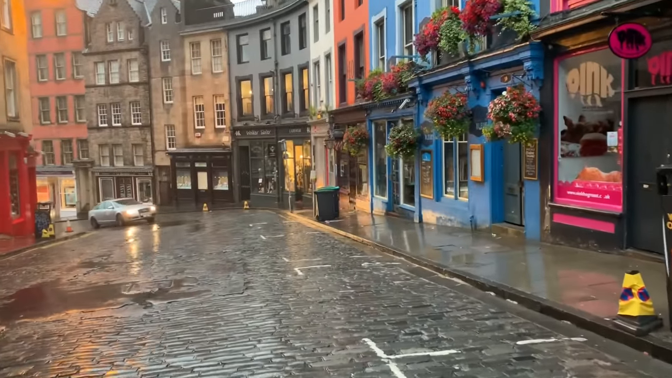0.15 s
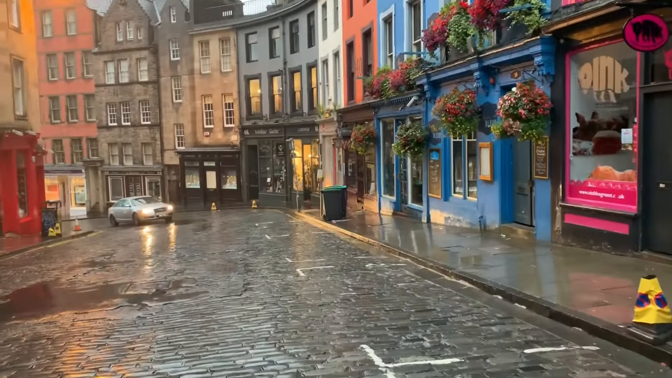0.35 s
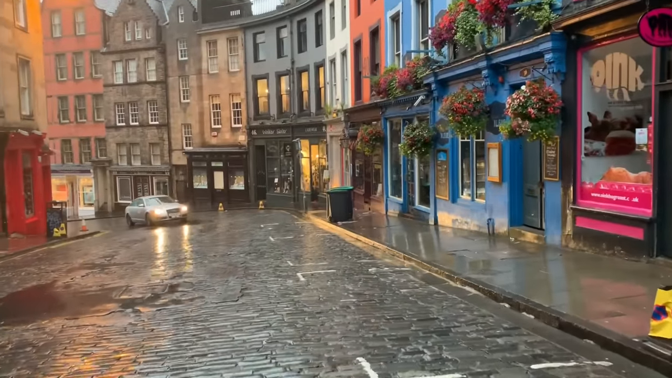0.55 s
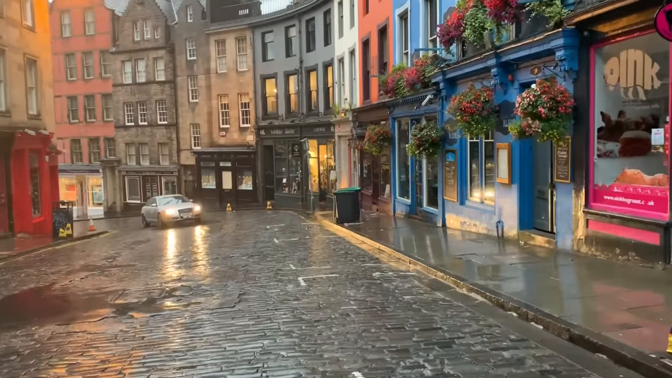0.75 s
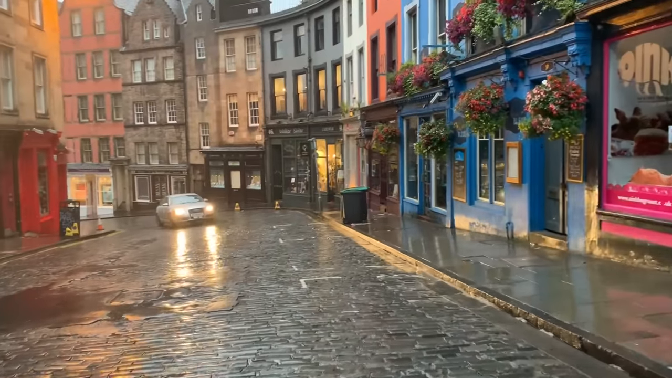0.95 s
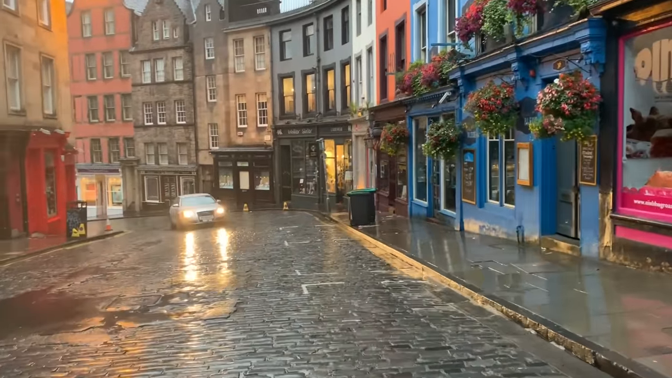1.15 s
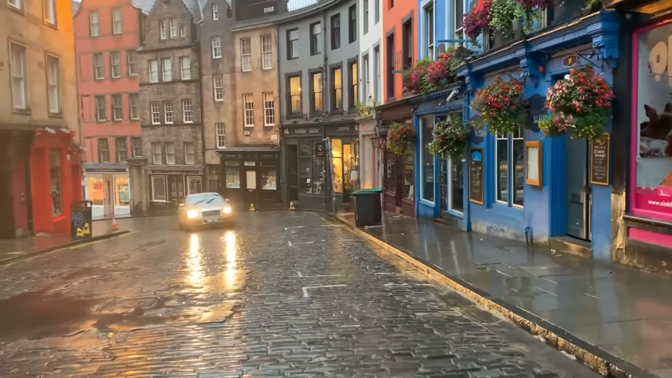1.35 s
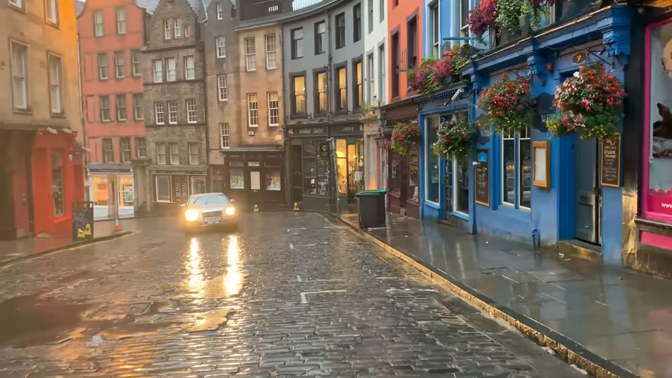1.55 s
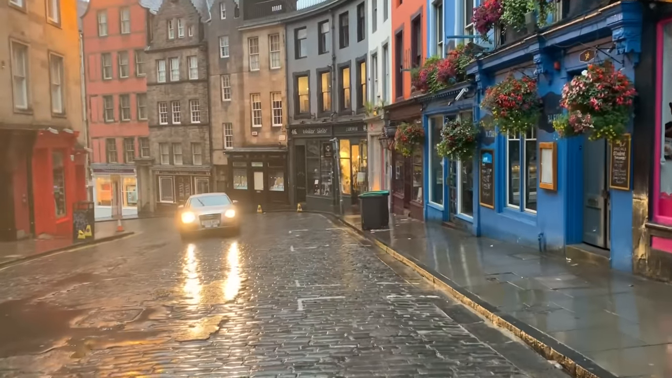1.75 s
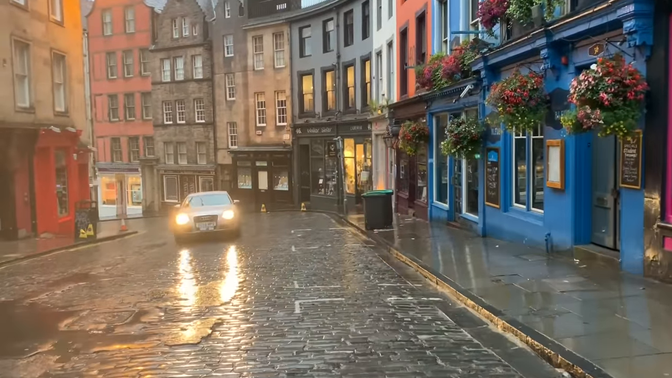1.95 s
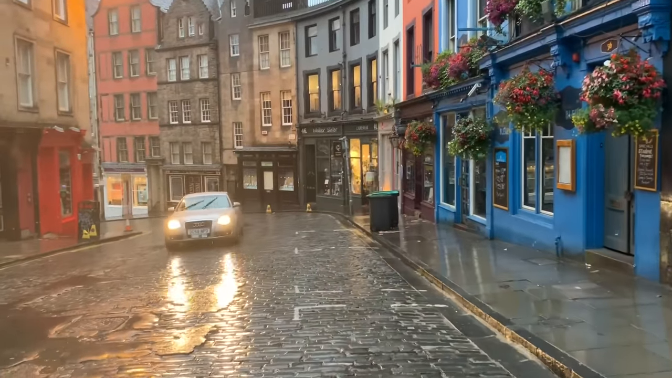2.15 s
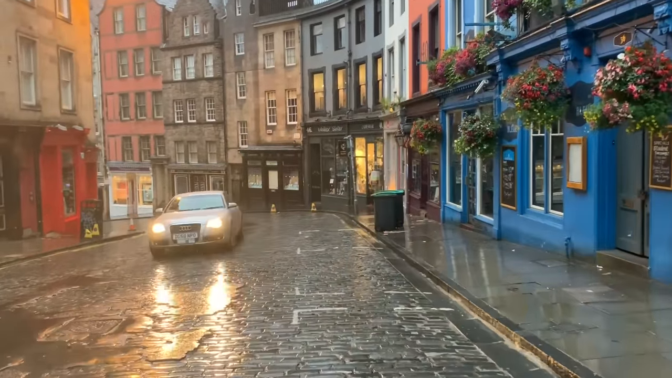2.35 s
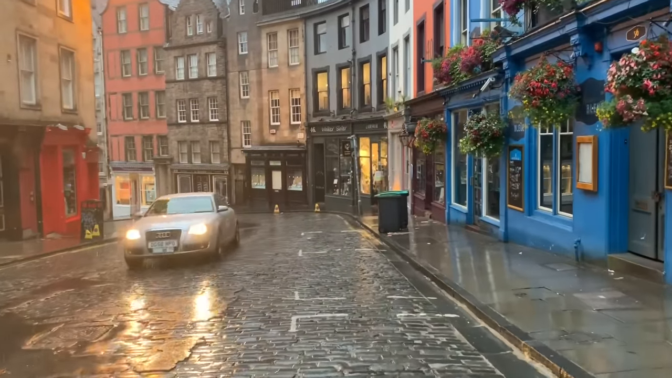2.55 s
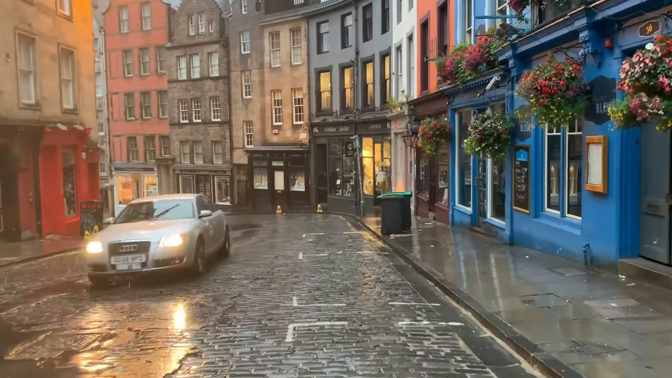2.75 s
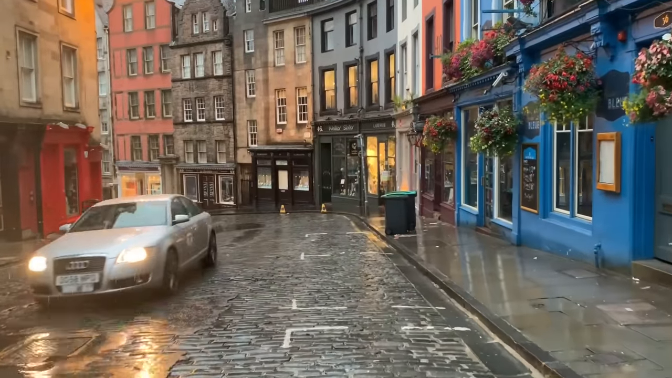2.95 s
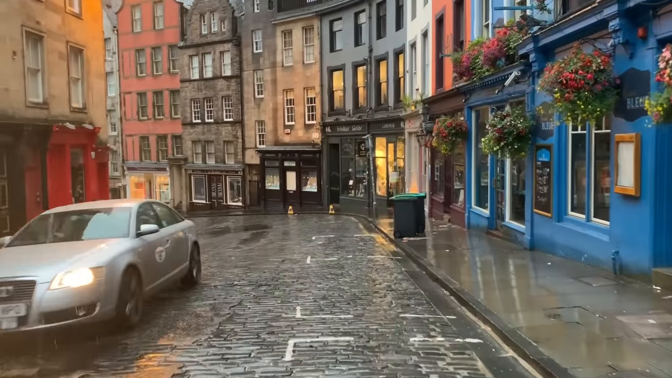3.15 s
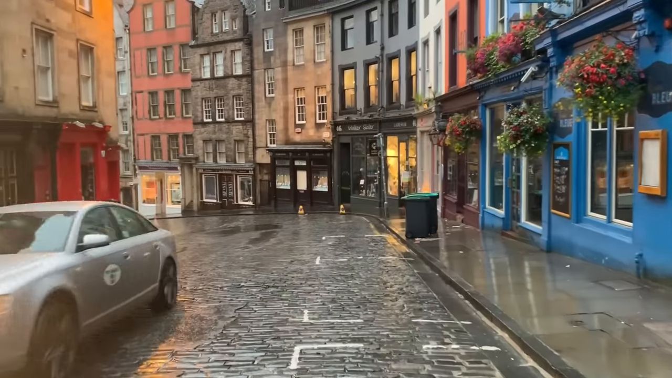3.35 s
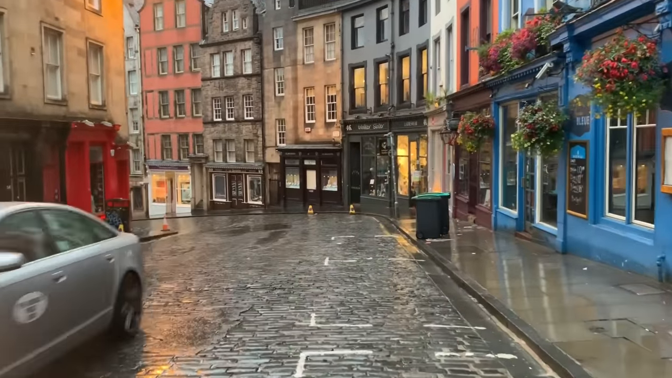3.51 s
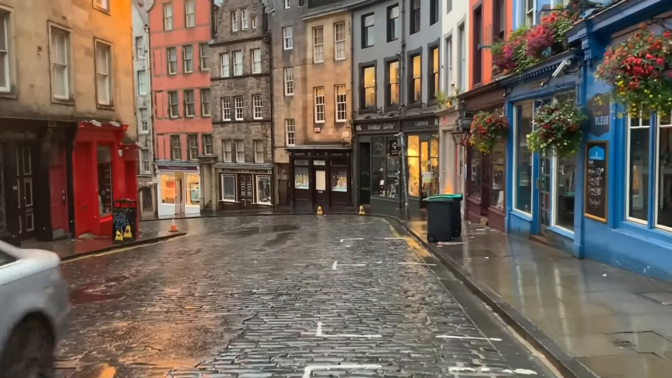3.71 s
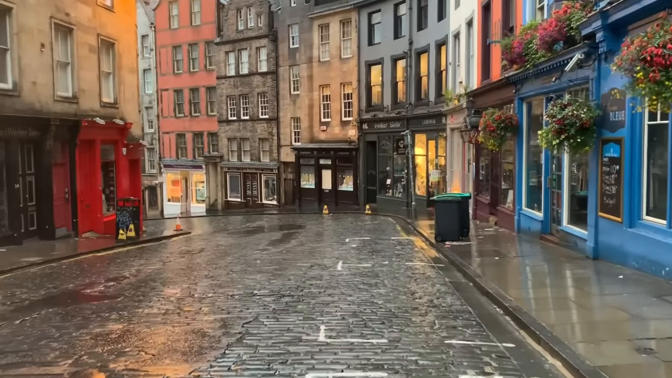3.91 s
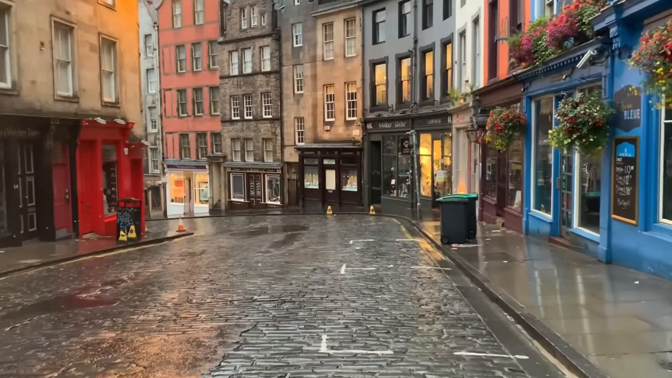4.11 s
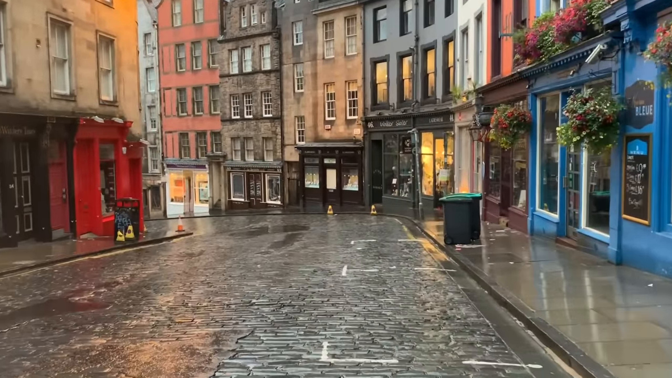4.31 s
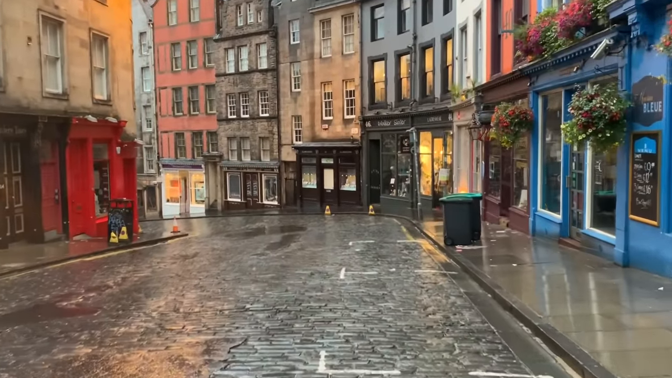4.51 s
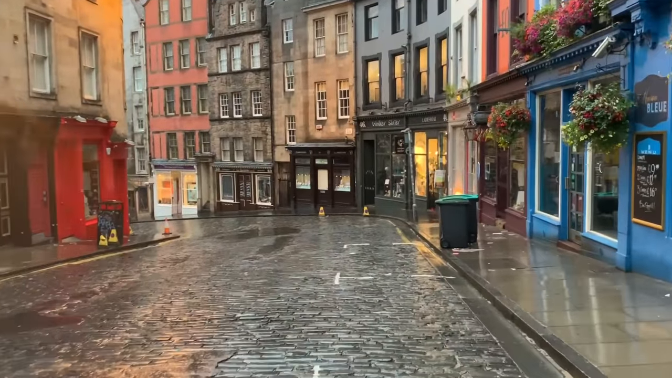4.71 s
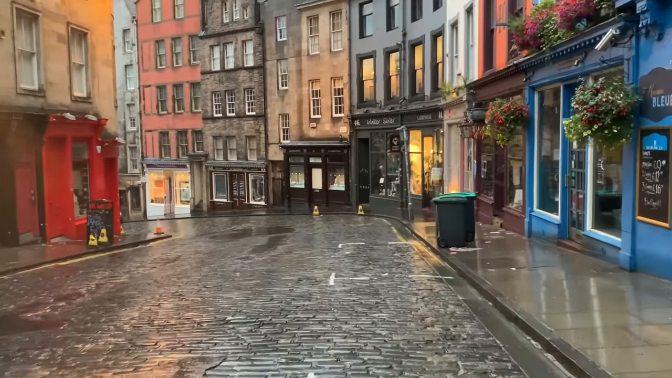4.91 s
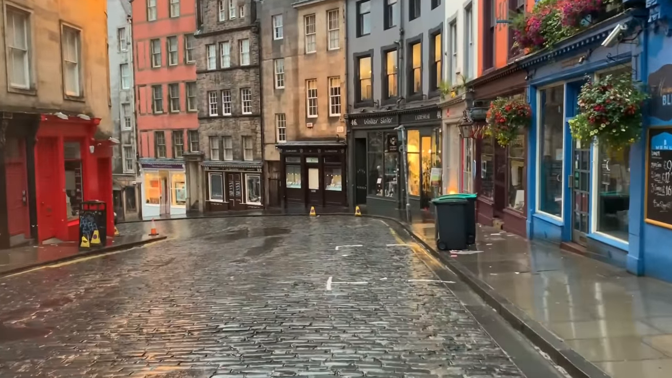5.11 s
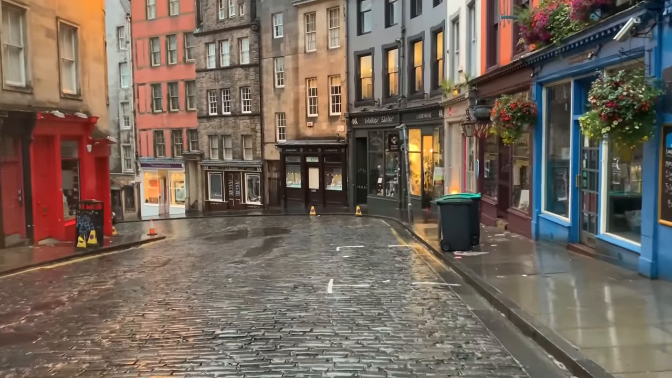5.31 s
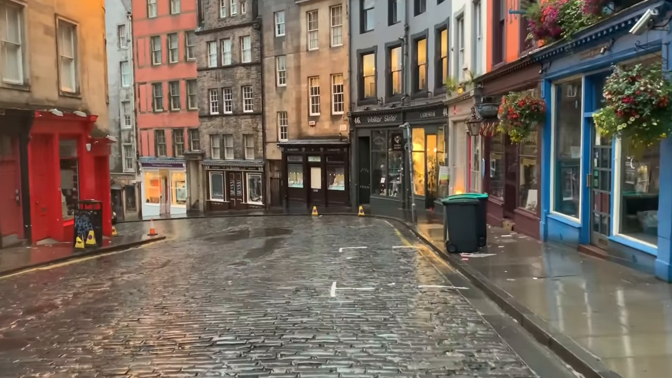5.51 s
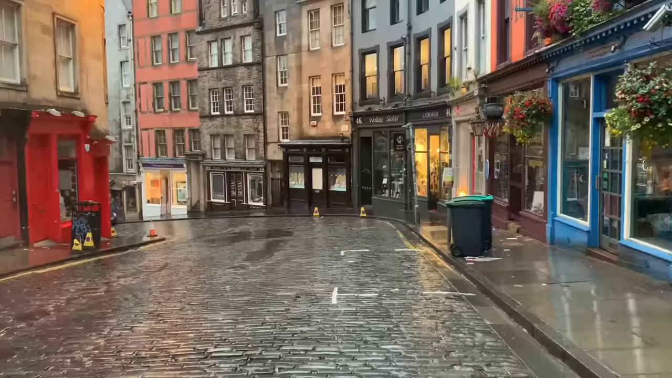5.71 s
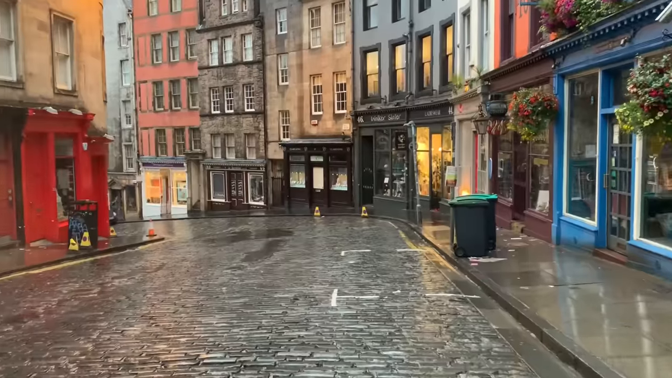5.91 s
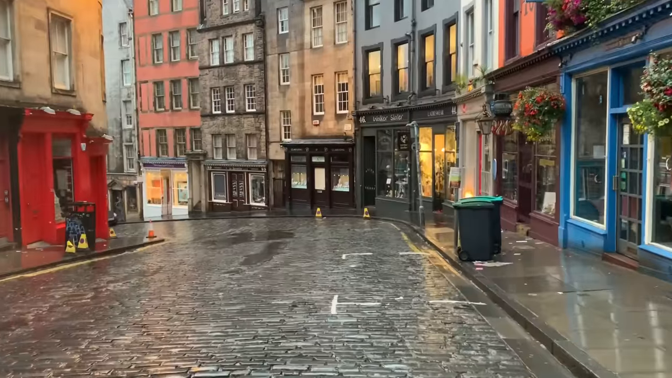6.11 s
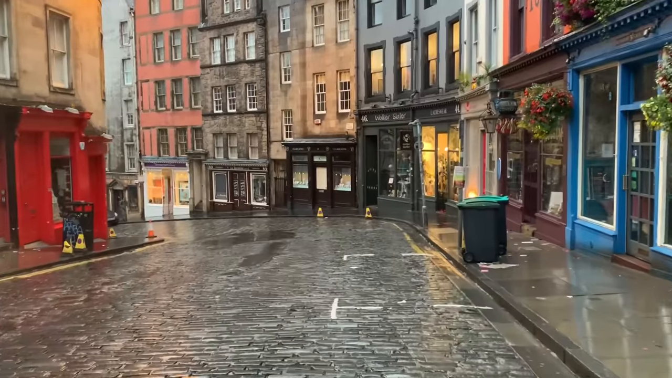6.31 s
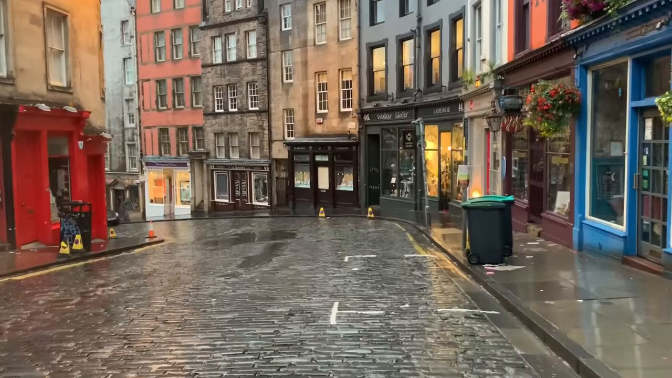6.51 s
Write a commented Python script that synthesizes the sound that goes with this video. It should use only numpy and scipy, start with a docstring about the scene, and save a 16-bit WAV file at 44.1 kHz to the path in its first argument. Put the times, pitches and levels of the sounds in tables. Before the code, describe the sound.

Heard in stereo from the side of a cobbled street between tall houses, a car's low drone and tyre rumble grow steadily louder. Short puddle splashes and hollow knocks join the clatter of wet stones. The car goes by close on the left a little past halfway, hissing with spray, and then fades with a watery swish. Light rain and distant traffic continue softly underneath.

```python
"""A wet cobbled street between tall house fronts, heard from a pair of microphones at the roadside.
Distant traffic murmurs and drizzle ticks as a car approaches from 20 m, its engine droning, its tyres
drumming on the stones and squeezing out water. Puddles burst, the air in a tyre booms, and from about 2 s
the wheels knock in deep joints. At 3.6 s the car passes 3.5 m away on the left with a brief hiss;
then it swishes off among the echoes of the houses and the engine eases."""
import sys
import numpy as np
from scipy import signal
from scipy.fft import rfft, irfft, next_fast_len
from scipy.io import wavfile
from scipy.ndimage import map_coordinates

SR = 44100
rng = np.random.default_rng(int(sys.argv[2]) if len(sys.argv) > 2 else 0)


def transcribe(signal):
    """Save signal, clipped to [-1, 1], as a 16-bit WAV file at the path in sys.argv[1]."""
    frames = np.atleast_2d(signal).T
    limited = np.clip(frames, -1, 1)
    pcm = np.round(limited * 32767).astype(np.int16)
    wavfile.write(sys.argv[1], SR, pcm)


N = 293694
TIME = np.arange(N) / SR
SPEED_M_PER_S, CLOSEST_M, ABREAST_S = 5.57, 3.45, 3.643   # the car's steady path past the microphones


def from_db(db):
    """Decibels to gain."""
    return 10 ** (np.asarray(db) / 20)


def rms_one(x):
    """Scale to an rms of 1."""
    return x / np.sqrt(np.mean(x ** 2) + 1e-20)


def in_time(rows):
    """A curve through (time, value) points."""
    return np.interp(TIME, *np.transpose(rows))


def swell(s, length_s):
    """A smooth rise and fall around s, above half height for length_s."""
    return .5 ** ((2 * (TIME - s) / length_s) ** 2)


def burst(s, level_db, t60, rise_s):
    """An envelope that rises quickly at s and dies away."""
    age = np.maximum(TIME - s, 0)
    return from_db(level_db - np.minimum(60 * age / t60, 200)) * (1 - np.exp(-age / rise_s))


def drift(rate):
    """A random curve of rms 1 that turns about rate times a second."""
    knots = rng.standard_normal(int(N / SR * rate) + 2)
    return rms_one(np.interp(TIME * rate, np.arange(len(knots)), knots))


def grains(per_s, spread_db):
    """Clicks at random moments, of uneven size and either sign; rms 1."""
    sizes = from_db(spread_db * np.minimum(rng.exponential(1, N), 4)) * rng.choice([-1, 1], N)
    return rms_one(sizes * (rng.random(N) < per_s / SR))


def butter(x, hz, kind, order=2):
    """Butterworth filter."""
    return signal.sosfilt(signal.butter(order, np.clip(hz, 10, .45 * SR), kind, fs=SR, output="sos"), x)


def coloured(x, spectrum):
    """Give x a smooth spectrum; rms 1."""
    hz, level_db = np.transpose(spectrum)
    size = next_fast_len(N, real=True)
    bins = np.maximum(np.fft.rfftfreq(size, 1 / SR), 1)
    gain = from_db(np.interp(np.log(bins), np.log(hz), level_db))
    return rms_one(irfft(rfft(x, size) * gain, size)[..., :N])


def resonate(x, modes):
    """Parallel resonances with alternating signs; rms 1."""
    out = 0
    for k, (hz, width, level_db) in enumerate(modes):
        radius = np.exp(-np.pi * width / SR)
        gain = (-1) ** k * from_db(level_db) * (1 - radius ** 2) / 2
        feedback = [1, -2 * radius * np.cos(2 * np.pi * hz / SR), radius ** 2]
        out = out + signal.lfilter([gain, 0, -gain], feedback, x + 1e-18)
    return rms_one(out)


def delayed(x, ms):
    """Delay x by a steady or moving time."""
    return map_coordinates(x, [np.arange(N) - ms * SR / 1000], order=3, mode="nearest")


def diffuse(apart_hz=520, size=N):
    """Noise from all around: alike at both microphones in the bass, unrelated in the treble."""
    mid, side = rng.standard_normal((2, size))
    side = butter(side, apart_hz, "high", order=1)
    return np.array([mid + side, mid - side]) / np.sqrt(2)


def travelled(offset_m=0):
    """Metres past the microphones of a point offset_m ahead of mid-car; negative on the approach."""
    return SPEED_M_PER_S * (TIME - ABREAST_S) + offset_m


def passing_db(offset_m, fall_ahead, fall_behind):
    """Level against the closest point: a power of the distance, with one exponent coming, one going."""
    along = travelled(offset_m)
    distance_db = 20 * np.log10(np.hypot(along, CLOSEST_M) / CLOSEST_M)
    return -distance_db * np.where(along < 0, fall_ahead, fall_behind)


def bearing():
    """Direction of the car: 0 far off and coming, a half abreast, 1 far off and going."""
    along = travelled()
    return (1 + along / np.hypot(along, CLOSEST_M)) / 2


def from_behind(offset_m=0.94, turn_m=0.49, far_share=0.44, fade_m=3.7):
    """Share of sound from the back of the tyres: it takes over as they pass, then echoes mix both sides."""
    along = travelled(offset_m)
    gone_by = (1 + np.tanh(along / turn_m / 2)) / 2
    return gone_by * (far_share + (1 - far_share) * np.exp(-(along / fade_m) ** 2))


def arriving(x, lead_ms, favour=0.42, turn_s=4.14, turn_length_s=0.29):
    """The right microphone lags by lead_ms; on the approach it favours the treble, the left one the mids."""
    ahead = (1 - np.tanh((TIME - turn_s) / turn_length_s)) / 2
    mids = butter(x + 1e-12, [600, 2100], "band", order=1)
    treble = butter(x + 1e-12, [5200, 6900], "band", order=1)
    tint = favour * ahead * (mids - treble)
    return np.array([x + tint, delayed(x - tint, in_time(lead_ms))])


def house_fronts(x, t60=0.79, first_echo_s=.012):
    """Echoes between the houses; their pattern changes as the car moves on."""
    hop, length = SR // 6, SR // 2
    padded, out = np.pad(x, (hop, 2 * hop)), np.zeros((2, N + 2 * SR))
    fade = np.sin(np.pi * np.arange(2 * hop) / (2 * hop))
    dying = from_db(-60 * TIME[:length] / t60) * (TIME[:length] > first_echo_s)
    for at in range(0, N + hop, hop):
        tail = diffuse(size=length) * dying
        tail /= np.sqrt(np.sum(tail ** 2) / 2)
        echo = signal.fftconvolve([padded[at:at + 2 * hop] * fade], tail, axes=1)
        out[:, at:at + echo.shape[1]] += echo
    return out[:, hop:hop + N]


def street(x, lead_ms, echo_db, echo_growth=0.15):
    """Direct sound plus echoes, whose share grows with the car's distance from the microphones."""
    echo = from_db(echo_db - passing_db(0, echo_growth, echo_growth))
    return (arriving(x, lead_ms) + echo * house_fronts(x)) / np.hypot(1, echo)


# far traffic, from all around: (frequency [Hz], relative level [dB])
TRAFFIC_SPECTRUM = [(15, -22), (35, 10), (60, -1.5), (110, -6.5), (170, -9), (225, -9), (350, -18),
                    (500, -13), (800, -13.5), (1100, -12), (1600, -18.5), (2400, -21.5), (5000, -28.5),
                    (7000, -33.5), (9000, -26), (16000, -106)]

def distant_traffic(level_db=-34.5):
    """The steady murmur of traffic far off in the town."""
    return from_db(level_db) * coloured(diffuse(), TRAFFIC_SPECTRUM)


# drops landing near the microphones: (time [s], level [dB])
NEAR_DROPS = [(.372, -28), (.682, -31), (1.375, -35), (2.516, -22.5), (2.711, -23), (4.554, -19),
              (4.722, -21), (4.978, -20), (6.188, -28), (6.506, -33)]
# the band they sound in: (low edge [Hz], high edge [Hz])
DROP_BAND = [1300, 6500]

def rain(patter_db=-61):
    """Fine drizzle ticks on the pavement; a few fat drops land close."""
    patter = from_db(patter_db) * np.array([grains(per_s=400, spread_db=3) for side in range(2)])
    envelope = sum(burst(s, level_db, t60=0.019, rise_s=.0003) for s, level_db in NEAR_DROPS)
    drops = envelope * diffuse(apart_hz=4000)
    return butter(patter, 2200, "high") + butter(drops, DROP_BAND, "band")


# the driver revs up, holds, then lifts off: (time [s], firing rate [Hz])
FIRING_RATE = [(0, 54.02), (1, 54.45), (1.95, 57.34), (2.4, 58.25), (3.28, 64.21), (3.65, 62.57),
               (4.2, 63.3), (5.4, 63.87), (5.6, 56.5), (6.07, 50.3), (6.66, 49.54)]
# the engine's fundamental and fourth harmonic at the microphones: (time [s], level [dB])
DRONE_LEVEL = [(0, -33), (.07, -31), (.25, -43), (.9, -45), (1.15, -27), (1.45, -22), (1.74, -33),
               (1.92, -21), (2.05, -26), (2.25, -23), (2.47, -29), (2.67, -23), (3.3, -17.5), (3.48, -27),
               (3.62, -23.5), (3.9, -27), (4.1, -17.5), (4.28, -24.5), (4.98, -27.5), (5.16, -13.5),
               (5.24, -30), (5.4, -25), (5.55, -30), (5.9, -29), (6.17, -27), (6.66, -50)]
FOURTH_LEVEL = [(0, -33), (1.2, -36), (2.4, -38), (3.25, -31.5), (3.56, -19.5), (3.78, -25), (4, -35),
                (6.66, -46)]

def engine(exhaust_db=-31, intake_db=-27, intake_follows=6.2, waver_db=2.4, shake_db=3, wander=0.00595):
    """Four harmonics of the firing rate, shaken by the road; the intake throws the third forwards."""
    second_db = exhaust_db + passing_db(offset_m=0, fall_ahead=0.88, fall_behind=0.75)
    third_db = intake_db + passing_db(offset_m=2.7, fall_ahead=0.42, fall_behind=1.0)
    third_db += intake_follows * revs_db()
    firing_hz = in_time(FIRING_RATE) * (1 + wander * drift(24.3))
    phase = 2 * np.pi * np.cumsum(firing_hz) / SR
    drone = from_db(in_time(DRONE_LEVEL) + waver_db * drift(14)) * np.sin(phase)
    second = from_db(second_db + waver_db * drift(28)) * np.sin(2 * phase)
    third = from_db(third_db + waver_db * drift(28)) * np.sqrt(1 - bearing()) * np.sin(3 * phase)
    fourth = from_db(in_time(FOURTH_LEVEL) + shake_db * drift(60)) * np.sin(4 * phase)
    return drone + second + third + fourth


def revs_db():
    """Engine speed against its highest, in decibels."""
    rate = in_time(FIRING_RATE)
    return 20 * np.log10(rate / rate.max())


# the car's body on the cobbles: (frequency [Hz], relative level [dB])
BODY_SPECTRUM = [(15, -38), (26, -10), (38, 1.5), (55, 2), (75, 2.5), (95, 0), (135, -1), (170, -8.5),
                 (260, -7.5), (600, -41.5)]

def body_rumble(level_db=-22):
    """The stones shake the body into a deep rumble."""
    gain = from_db(level_db + passing_db(offset_m=-0.51, fall_ahead=0.8, fall_behind=0.61))
    return gain * coloured(diffuse(apart_hz=460), BODY_SPECTRUM)


# how much earlier the tyres reach the left microphone: (time [s], lead [ms])
TYRE_LEAD = [(0, -0.11), (3.2, -0.0065), (3.75, 0.24), (4.5, 0.42), (5.1, 0.55), (6.66, 0.53)]
# resonances of the tyre carcass: (frequency [Hz], width [Hz], relative level [dB])
CARCASS_MODES = [(155, 77, -4.5), (215.7, 21.3, 2.5), (255.4, 43, -1.5), (338, 101, -6), (426.5, 61, -5.5)]

def tyre_drum(level_db=-23.5):
    """Every stone drums on the carcass of the tyre."""
    gain = from_db(level_db + passing_db(offset_m=-0.33, fall_ahead=0.8, fall_behind=0.92))
    ringing = resonate(grains(per_s=600, spread_db=3.0), CARCASS_MODES)
    drum = rms_one(butter(ringing, [130, 560], "band"))
    return street(gain * drum, TYRE_LEAD, echo_db=-10.5)


# rougher and smoother stretches of paving: (time [s], tread level change [dB])
ROUGHNESS = [(0, -3), (1.25, -3), (1.8, -0.2), (2.3, 0), (2.7, 1.5), (3.2, 0.5), (3.52, -2), (3.7, 1),
             (3.89, -8), (3.96, 4), (4.22, -0.5), (4.55, -1), (4.9, -0.5), (5.4, 1.5), (5.9, 2),
             (6.66, 0.5)]
# the tread from ahead and from behind, the air in its grooves, and the hollow under the rear tyre,
# heard only close by: (frequency [Hz], width [Hz], relative level [dB])
FRONT_MODES = [(425, 75, -4.5), (565.5, 109, 5.5), (617.6, 171, 3)]
BACK_MODES = [(509, 145, -6), (635, 190, -4.5), (807, 280, -0.1), (960, 350, -2.5), (1010, 1150, -11)]
GROOVE_MODES = [(840, 60, 2.5), (862, 126, -1.5), (1105, 220, -10.5)]
HOLLOW_MODES = [(634, 53, -1), (743, 125, -9)]

def tread_clatter(front_db=-20.0, back_db=-13.5, groove_db=-2, groove_follows=2.7, hollow_db=-25):
    """Stones slap the tread, which rings differently fore and aft; the grooves grow with the revs."""
    road_db = in_time(ROUGHNESS) + horn_db()
    front_gain = from_db(front_db + road_db + passing_db(offset_m=1.2, fall_ahead=0.99, fall_behind=1.3))
    back_gain = from_db(back_db + road_db + passing_db(offset_m=-0.16, fall_ahead=1, fall_behind=1.67))
    slaps = grains(per_s=900, spread_db=1.5) * from_db(2.0 * drift(60))   # rows of stones lie unevenly
    grooves = from_db(groove_db + groove_follows * revs_db()) * resonate(slaps, GROOVE_MODES)
    front = front_gain * rms_one(resonate(slaps, FRONT_MODES) - grooves)
    back = back_gain * resonate(slaps, BACK_MODES)
    behind = from_behind()
    tread = np.sqrt(1 - behind) * front + np.sqrt(behind) * back
    hollow = resonate(grains(per_s=300, spread_db=0), HOLLOW_MODES)
    hollow *= from_db(hollow_db) * swell(3.97, length_s=0.85)
    clatter = butter((tread + hollow) * unloading(), 1276, "low", order=4)
    return street(clatter, TYRE_LEAD, echo_db=-3.0)


def horn_db(sideways_db=5.5):
    """The wedge between tyre and road throws sound along the street, so less goes out to the side."""
    return -sideways_db * (1 - (2 * bearing() - 1) ** 2)


# how much earlier the water's hiss reaches the left microphone: (time [s], lead [ms])
WATER_LEAD = [(0, 0.098), (1.7, 0.11), (2.4, 0.17), (3.1, 0.21), (3.5, 0.24), (3.8, 0.342), (4.3, 0.35),
              (6.66, 0.37)]
# water standing on the road: (time [s], wetness [dB])
ROAD_WETNESS = [(0, -9), (.6, -5), (1.68, -1.3), (2.0, -3), (2.4, -3), (3.12, -1.5), (3.25, -1.5),
                (3.55, -1.5), (4.1, -2), (4.5, 1), (5.1, 5), (5.7, 0), (6.66, 1)]
# the swish is dull from afar, brightest abreast and just after: (time [s], treble lift [dB])
SWISH_TREBLE = [(0, -11), (1.2, -3), (2.3, -9), (2.8, -3), (3.3, 2.5), (3.8, 4.5), (4.4, 4.5), (5.2, 4.5),
                (6.66, -1)]
# water squeezed out, and water flung off: (frequency [Hz], relative level [dB])
SWISH_SPECTRUM = [(700, -25), (1100, 9.5), (1400, 3), (1750, 0.5), (2300, 0), (3200, -5), (5000, -9),
                  (6600, -8.5), (7600, -13.5), (9500, -50)]
SPRAY_SPECTRUM = [(5000, -33), (6800, -1.5), (7800, 2.5), (9400, 5), (11000, 2), (13000, 2.5), (16000, -1)]

def tread_water(swish_db=-29, spray_db=-26.0, spatter_db=-12, spurt_db=3.5, treble_hz=3140):
    """The tread squeezes water out in spurts and flings it off as fine spray and coarser spatter."""
    wetness_db = in_time(ROAD_WETNESS)
    squeeze_db = swish_db + passing_db(offset_m=1.87, fall_ahead=0.85, fall_behind=1.086)
    fling_db = spray_db + passing_db(offset_m=0.44, fall_ahead=1.216, fall_behind=2.4)
    spurts_db = spurt_db * drift(80)
    hiss = coloured(grains(per_s=6000, spread_db=3), SWISH_SPECTRUM)
    hiss *= from_db(spurts_db + 1.4 * drift(30))
    spatter = coloured(grains(per_s=90, spread_db=4), SWISH_SPECTRUM)
    spatter *= from_db(spatter_db - 3 * swell(ABREAST_S, length_s=1.1))   # softer ticks as the car passes
    swish = hiss + spatter
    treble = butter(swish, treble_hz, "high", order=1)
    swish = swish - treble + treble * from_db(in_time(SWISH_TREBLE))
    swish *= from_db(squeeze_db + 0.42 * wetness_db)
    spray = coloured(grains(per_s=5000, spread_db=5.0), SPRAY_SPECTRUM)
    spray *= from_db(fling_db + wetness_db + spurts_db + 0.39 * drift(30))
    return street(swish, WATER_LEAD, echo_db=1.0) + street(spray, WATER_LEAD, echo_db=4.0)


# puddles hit on the approach, the first at 0.695 s a drop landing close by: (time [s], level [dB], decay t60
# [s])
SPLASH_EVENTS = [(.695, -33, 0.042), (1.262, -42, .05), (1.43, -34, 0.24), (1.522, -34, 0.074), (1.643, -33, .12),
                 (1.722, -27, .06), (1.951, -31, 0.045), (2.328, -28, 0.043), (2.837, -19, 0.046),
                 (2.935, -17, 0.13), (3.183, -22.5, 0.3), (3.226, -22, 0.13), (3.28, -26, .08),
                 (3.315, -28, 0.12), (3.352, -26, 0.11), (3.4, -21, .1), (3.61, -24, .05)]
# their droplets from close by: (frequency [Hz], relative level [dB])
DROPLET_SPECTRUM = [(800, 0), (2000, 10), (3000, 9.5), (4500, 4), (6500, -5.5), (8200, 1), (9400, 3.5),
                    (16000, 1)]

def splashes(far_top_hz=4500):
    """A tyre bursts a puddle into a dense shower of droplets, duller from afar."""
    envelope = sum(burst(s, level_db, t60, rise_s=0.00081) for s, level_db, t60 in SPLASH_EVENTS)
    droplets = coloured(grains(per_s=6000, spread_db=2), DROPLET_SPECTRUM)
    near = from_db(passing_db(offset_m=1.3, fall_ahead=0.7, fall_behind=0.7))
    dull = butter(droplets, far_top_hz, "low", order=1)
    return arriving(envelope * (dull + near * (droplets - dull)), WATER_LEAD)


# booms at dips in the road: (time [s], length [s], pitch [Hz], level [dB])
ROAD_DIPS = [(1.625, 0.15, 224, -22), (2.157, 0.077, 229.3, -24.5), (4.208, 0.055, 215.3, -23.5),
             (4.511, .16, 214.7, -27.5), (5.292, 0.24, 210.4, -30.5)]

def tyre_booms(wander=0.0442, shake_db=3):
    """A dip sets the air inside a tyre booming briefly at its own pitch, shaken by the stones."""
    clock = np.cumsum(1 + wander * drift(70)) / SR
    air = sum(from_db(level_db) * swell(s, length_s) * np.sin(2 * np.pi * hz * clock)
              for s, length_s, hz, level_db in ROAD_DIPS)
    return air * from_db(shake_db * drift(70))


# knocks in deep joints within about 10 m of the microphones:
# (time [s], level [dB], ring pitch [Hz], ring t60 [s], thud against the ring [dB])
JOINTS = [(1.951, -10.5, 850, 0.011, -12), (2.118, -17, 840, 0.034, -12), (2.455, -18, 556, 0.033, -7),
          (2.842, -8, 594, 0.019, -8), (2.992, -17, 580, .03, -8), (3.058, -11, 500, 0.023, -10),
          (3.118, -8, 825, 0.017, -5), (3.141, -8, 800, 0.013, -8), (3.346, -12, 630, 0.016, -11),
          (3.472, -14, 635, 0.037, -14), (3.614, -5, 660, 0.022, -12), (3.625, -11, 640, .018, -10),
          (3.656, -12.5, 654, 0.047, -3), (3.762, -6.5, 823, .03, 0), (3.777, -6, 760, 0.018, -5),
          (3.81, -8, 644, 0.044, 0), (3.821, -9, 640, 0.027, 7), (3.85, -10.5, 653, .06, -10),
          (3.973, -4, 700, 0.026, -5), (3.987, -12, 696, 0.049, -8), (4.018, -14, 700, .025, 8),
          (4.071, -15, 524, 0.018, 13), (4.11, -1.5, 790, 0.027, -11), (4.165, -4.5, 750, .015, -5),
          (4.194, -6, 790, .03, -9), (4.208, -4, 875, 0.027, -11), (4.323, -10.5, 686, 0.033, -14),
          (4.329, -9, 680, .04, -10), (4.463, -7, 790, .03, -4), (4.549, -11.5, 910, 0.07, -10),
          (4.607, -10, 705, .018, -15)]
# partials of a knock: (multiple of the ring pitch [ratio], relative level [dB])
RING_MODES = [(.57, -10), (.8, -7.5), (1, 1.5), (1.21, -4.5), (1.46, -16)]

def joint_knocks(trim_db=-0.1, squirm=0.12, contact_s=0.0007, thud_hz=110, thud_t60=0.022):
    """Soft rubber drops into a joint: a thud and a hollow ring, its pitch unsteady as the tread squirms."""
    out = np.zeros(N)
    age = TIME[:SR // 8]
    contact = 1 - np.exp(-(age / contact_s) ** 2)
    stretch = 1 + squirm * drift(200)
    for s, level_db, hz, t60, thud_db in JOINTS:
        at = round(s * SR)
        span = slice(at, at + len(age))
        phase = 2 * np.pi * hz * np.cumsum(stretch[span]) / SR
        ring = sum(from_db(mode_db) * np.sin(multiple * phase + rng.uniform(-0.95, 1))
                   for multiple, mode_db in RING_MODES)
        ring *= from_db(-60 * age / t60)
        thud = np.sin(2 * np.pi * thud_hz * age) * from_db(thud_db - 60 * age / thud_t60)
        out[span] += from_db(level_db + trim_db) * contact * (ring + thud)
    return street(butter(out + 1e-18, 2050, "low", order=4), TYRE_LEAD, echo_db=-10)


def unloading(dip_db=-4, before_s=0.0084, length_s=0.016):
    """The tyre lifts off the stone just before each joint, and the tread's level dips for a moment."""
    lifted = np.max([swell(s - before_s, length_s) for s, *_ in JOINTS], axis=0)
    return from_db(dip_db * lifted)


# the two bands of the hiss close by: (frequency [Hz], width [Hz], relative level [dB])
HISS_BANDS = [(4000, 1500, 0), (2446, 760, 0)]

def passing_hiss(level_db=-33, loudest_s=3.73, length_s=0.82):
    """A brief hiss as the car passes the microphones, moving from a 4 kHz band to a 2.4 kHz band."""
    high, low = (resonate(grains(per_s=7000, spread_db=1.0), [band]) for band in HISS_BANDS)
    low_share = from_behind(offset_m=1.4, turn_m=0.31)
    hiss = butter(np.sqrt(1 - low_share) * high + np.sqrt(low_share) * low, [1400, 6000], "band")
    return arriving(from_db(level_db) * swell(loudest_s, length_s) * hiss, WATER_LEAD)


def scene():
    """The wet street and the passing car, as they reach the two microphones."""
    background = distant_traffic() + rain()
    rolling = engine() + body_rumble() + tyre_drum() + tread_clatter() + tread_water()
    return background + rolling + splashes() + tyre_booms() + joint_knocks() + passing_hiss()


def record(dry, right_louder_db=0.44, split_hz=7050, left_lag_ms=.26, bottom_hz=29.4, top_hz=15900):
    """Deep bass and top are cut; both channels carry the right microphone's treble, later on the left."""
    balance = from_db([[-right_louder_db / 2], [right_louder_db / 2]])
    sound = butter(dry, bottom_hz, "high", order=4) * balance
    treble = signal.sosfiltfilt(signal.butter(8, split_hz, "high", fs=SR, output="sos"), sound)
    shared = np.array([delayed(treble[1], left_lag_ms), treble[1]])
    out = np.clip(sound - treble + shared, -1, 1)
    return signal.sosfilt(signal.ellip(12, .1, 90, top_hz, fs=SR, output="sos"), out)


dry = scene()
out = record(dry)
transcribe(out)
```